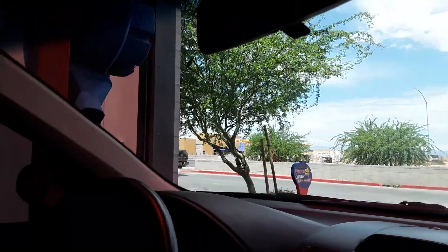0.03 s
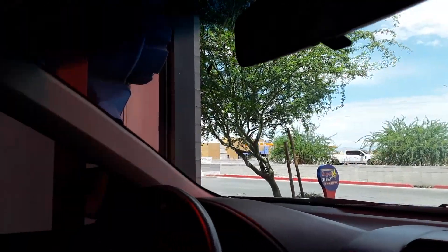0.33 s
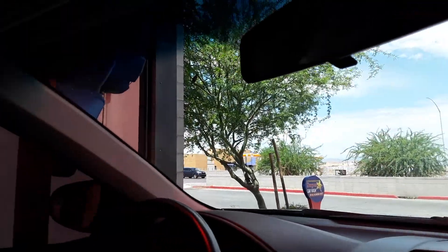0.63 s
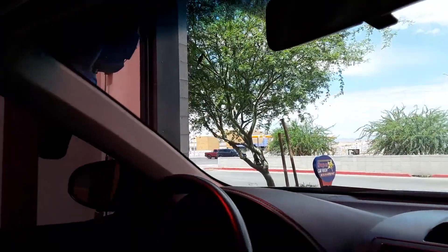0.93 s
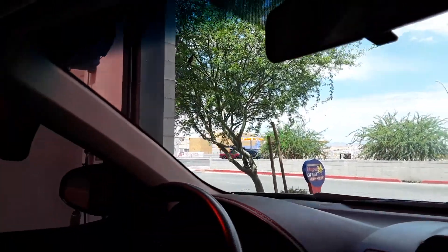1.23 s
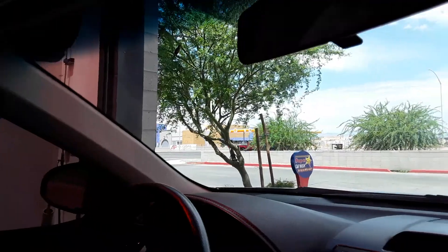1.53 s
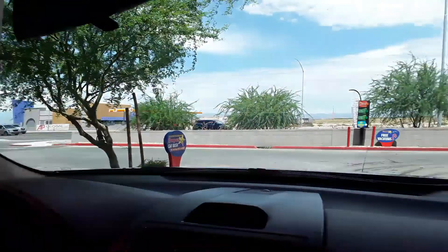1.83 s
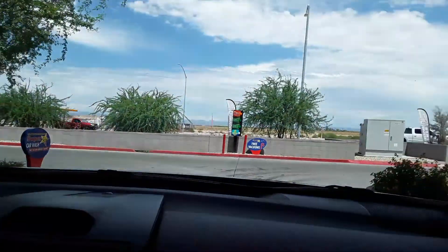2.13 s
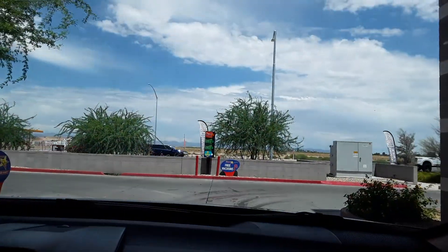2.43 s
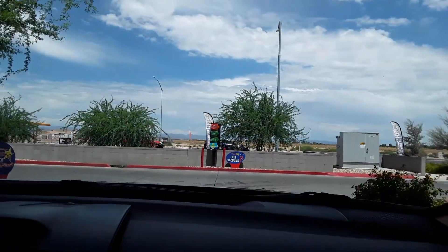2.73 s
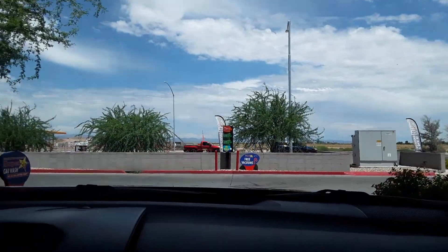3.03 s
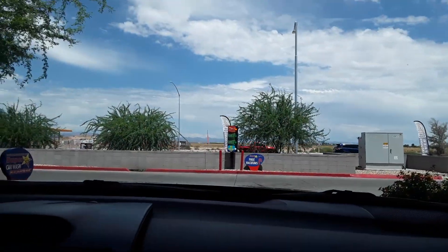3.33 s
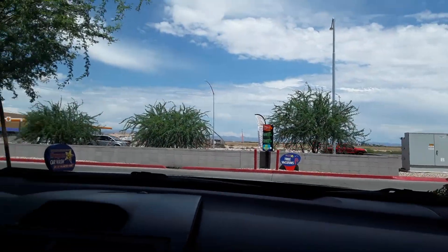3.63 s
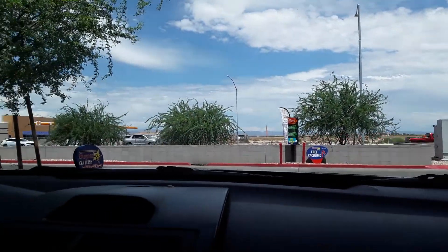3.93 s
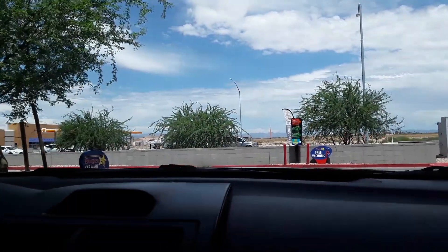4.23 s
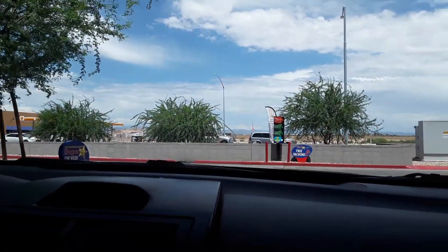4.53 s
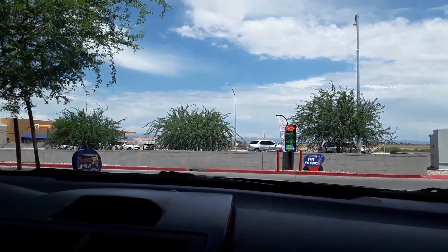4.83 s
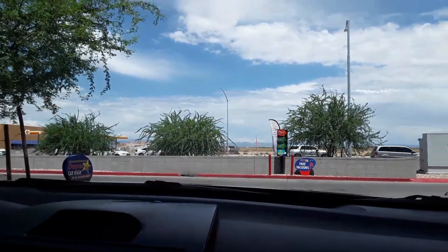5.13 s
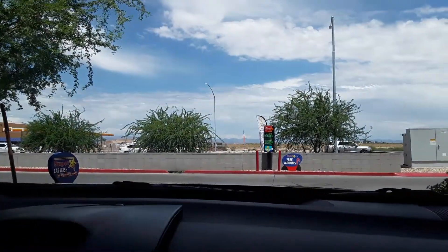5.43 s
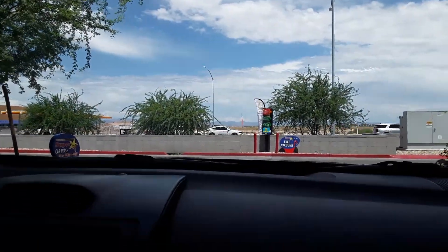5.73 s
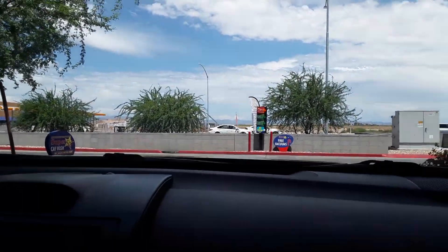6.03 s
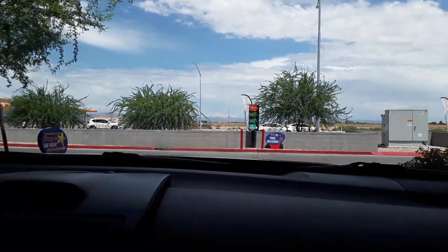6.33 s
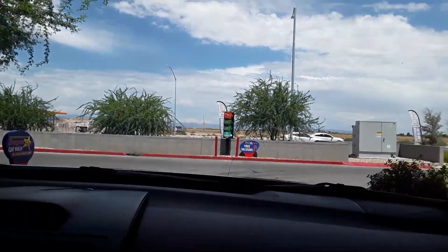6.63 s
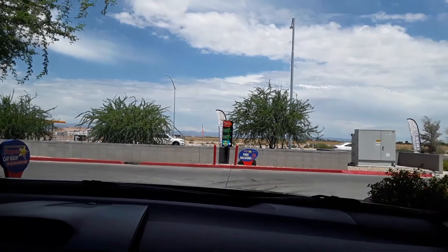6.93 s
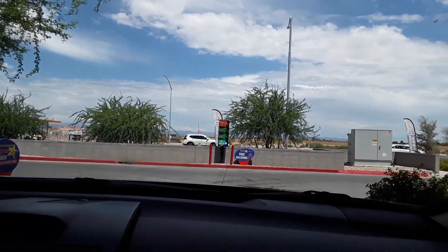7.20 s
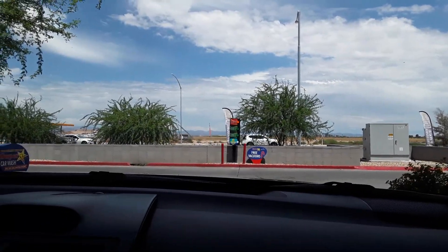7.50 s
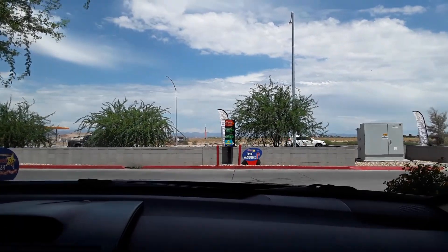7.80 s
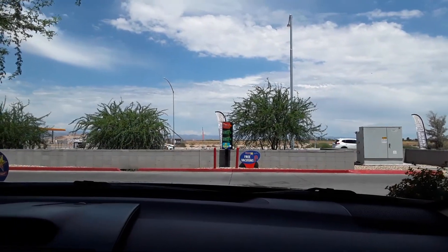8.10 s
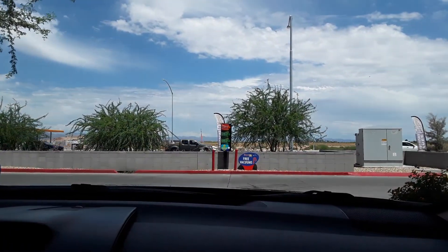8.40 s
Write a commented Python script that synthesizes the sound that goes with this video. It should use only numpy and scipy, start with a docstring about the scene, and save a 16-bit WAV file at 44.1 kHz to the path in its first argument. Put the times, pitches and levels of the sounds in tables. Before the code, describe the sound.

Strong blowers push a loud, deep rush of air over a car cabin as spray fizzes, easing slightly near the end.

```python
"""Air jets of car wash dryers, heard from inside a car that creeps out of the tunnel.
Their turbulence buffets the body, at times in harder gusts, and drives the cabin's low modes into a boom.
The blowers roar, with a faint blade tone, and air hisses along the seal of the left window.
Sheets of fine spray fizz on the glass, and two soft knocks sound on the body.
Near the end the rush fades and a few small hard impacts tick in the cabin."""
import sys
import numpy as np
from scipy import signal
from scipy.fft import rfft, irfft, next_fast_len
from scipy.io import wavfile
from scipy.ndimage import uniform_filter1d, minimum_filter1d

SR = 44100
rng = np.random.default_rng(int(sys.argv[2]) if len(sys.argv) > 2 else 0)


def dump_mix(stems):
    """Bounce the given channels to the path in sys.argv[1] as a 16-bit WAV at rate SR."""
    frames = np.atleast_2d(stems).T  # one column per channel
    limited = np.clip(frames, -1, 1)  # hard clip at full scale
    pcm = np.round(limited * 32767).astype(np.int16)
    wavfile.write(sys.argv[1], SR, pcm)


N = 381884
TIME = np.arange(N) / SR
FFT_SIZE = next_fast_len(N, real=True)
BINS_HZ = np.fft.rfftfreq(FFT_SIZE, 1 / SR)

# strength of the blowers and their air stream: time_s, roar_db, hiss_db
AIR_STREAM = [(0.0, -39.0, -40), (1.0, -40.5, -40.5), (1.25, -41.5, -45), (2.55, -40, -42.5),
              (3.3, -41, -43.5), (4.6, -41.0, -42.5), (5.0, -40.5, -41.5), (6.4, -41.5, -43),
              (7.2, -38.5, -41.5), (8.3, -44, -45.5), (8.66, -42.5, -45)]
# sheets of water blown over the glass: peak_s, length_s, level_db
WATER_SHEETS = [(0, 0.32, -59), (.73, 0.53, -53), (1.0, .12, -52), (1.35, .25, -63), (2.34, 0.082, -56),
                (3.09, 1, -54), (3.55, 0.33, -54), (4.9, 1.5, -50.5), (5.24, .07, -52), (5.65, 0.37, -62),
                (6.33, .06, -56), (6.58, .06, -53), (7.2, .65, -54), (7.63, .04, -54)]
MIST_DB = -65  # the thin spray between the sheets
# spectrum of water striking glass: frequency_hz, gain_db
SPRAY_SPECTRUM = [(5000, -17), (7700, -5.5), (8500, -3.5), (10700, -2.5), (11500, 4.5), (12900, 1),
                  (14100, -7), (14600, -11), (15100, -16), (15600, -8), (15900, -12)]


def jet_buffeting(lift_db, body_db=1.03, flutter_db=0.54, rush_share=0.45):
    """Forced vibration: turbulent jets shake roof and glass, and at first excite a panel resonance."""
    # force of the jets, falling as the car leaves: time_s, body_db, windscreen_db
    jets = [(0.0, -18.5, -34), (1.0, -18.5, -35), (1.4, -20.0, -36.5), (1.65, -19.5, -36.0),
            (2.05, -21.5, -36), (2.4, -20.5, -34.5), (3.25, -20, -36.5), (3.55, -18.5, -35.5),
            (3.95, -20.0, -34.5), (4.35, -18, -32.5), (4.7, -19.5, -35), (5.0, -19, -33.0),
            (5.4, -19.0, -36), (6.25, -23.0, -37), (6.9, -17.5, -35.5), (7.5, -21, -34.5),
            (8.2, -22.0, -38.5), (8.66, -29, -38.5)]
    # spectrum of the shaken body: frequency_hz, gain_db
    body_spectrum = [(130, -33), (215, -4.5), (265, -3.5), (300, -3.5), (360, 1), (400, -2.5), (425, -3.5),
                     (470, -4), (525, -8), (575, -9.5), (660, -13), (720, -15.5), (800, -23), (1200, -57.5)]
    # spectrum of the rush over the windscreen: frequency_hz, gain_db
    rush_spectrum = [(500, -12), (720, -0.5), (820, 1.5), (900, 0), (1030, 0), (1180, -4), (1350, -5.5),
                     (1500, -17), (2400, -39)]
    # drone of a panel while a jet stands on it: time_s, level_db
    drone = [(0, -20.5), (.5, -19.5), (1.1, -22), (1.7, -18), (2.0, -27.5), (2.6, -28.5), (8.66, -58)]
    body = level(jets) * steadied(turbulence(spectrum(body_spectrum)), size=6000)
    rush = level(jets, column=2) * turbulence(spectrum(rush_spectrum))
    panel = level(drone) * steadied(turbulence(resonance(hz=250.3, width_hz=33)), size=7000)
    gusting = gain_of(body_db + lift_db) * body + gain_of(rush_share * lift_db) * rush
    return gain_of(flutter_db * drift(rate_hz=11.5)) * gusting + panel


def cabin_boom(deep_lift_db, upper_lift_db, deep_db=-0.42, upper_db=-0.54, sway_db=1.56):
    """Cavity resonance: two groups of low air modes trade strength as the jets move along the car."""
    # the air's steady load on the cabin: time_s, deep_db, upper_db
    load = [(0.0, -11.5, -18.0), (0.8, -17, -20.5), (1.5, -15, -24), (2.5, -16, -18.5), (3.3, -18, -15),
            (4.5, -14.5, -16.5), (5.6, -18.5, -16.5), (6.6, -15.0, -18.5), (7.7, -18.5, -16.5),
            (8.2, -21, -17), (8.66, -20.5, -23)]
    # response of the deep modes: frequency_hz, gain_db
    deep_spectrum = [(15, -66), (30, -41), (48, -31), (62, -31), (80, -19.5), (98, -12), (113, -0.5),
                     (135, 0), (147, 4), (160, -19.5), (200, -22), (400, -80)]
    # response of the upper modes: frequency_hz, gain_db
    upper_spectrum = [(90, -48), (135, -9), (150, -4), (172, 1), (192, -5), (215, -15.5), (260, -39),
                      (400, -76.5)]
    deep = steadied(turbulence(spectrum(deep_spectrum)), size=3500)
    upper = steadied(turbulence(spectrum(upper_spectrum)), size=4000)
    trade_db = sway_db * drift(rate_hz=4.4)
    return (gain_of(deep_db + deep_lift_db + trade_db) * level(load) * deep
            + gain_of(upper_db + upper_lift_db - trade_db) * level(load, column=2) * upper)


def gust_lifts():
    """Unsteady loading: brief gusts shift each boom up or down in dB, and only ever raise the buffeting."""
    # a jet hits harder for a moment: peak_s, length_s, deep_db, upper_db, buffet_db
    gusts = [(0.148, 0.051, 4, 0, 1), (0.446, 0.087, 3.5, 1, 3), (.58, 0.059, 4, 2.5, 2),
             (1.693, 0.071, -7.5, 6.5, 5), (2.174, 0.12, -1, 5, -0.5), (2.328, 0.058, 4, 0, 2.5),
             (2.665, 0.13, 7, 0.5, 1), (4.21, 0.043, 0, 0, 1.5), (4.873, .12, -4, 3.5, 4),
             (5.198, 0.15, 7.5, 2, 1.5), (5.993, 0.069, 5.5, 1.5, 2), (6.57, 0.1, 3, -1, -1.5),
             (6.775, 0.14, 5.5, -9, 0.5), (7.192, .06, 6, 6.5, 4.5), (7.28, 0.11, -3, 5, 6),
             (7.604, 0.062, 4, 4.5, 0.5), (8.462, 0.053, -2, 10.5, 1)]
    return sum(np.outer([deep_db, upper_db, max(buffet_db, 0)], swell(peak_s, length_s))
               for peak_s, length_s, deep_db, upper_db, buffet_db in gusts)


def body_rumble():
    """Structural resonance: the whole body shudders, most strongly under each row of nozzles."""
    # passages under the nozzles: peak_s, length_s, level_db
    passes = [(1.75, 1.34, -30), (6.5, 2, -34)]
    shudder = steadied(turbulence(resonance(hz=77, width_hz=17.6)), size=9000)
    return swells(passes, floor_db=-38.5) * shudder


def blowers(blade_hz=706.7, waver_hz=1.3, throb_db=2, flutter_db=0.5, low_ring_db=-4):
    """Fan noise: a broadband roar, two duct resonances and a nearly steady blade-passing tone."""
    # spectrum of the roar: frequency_hz, gain_db
    roar_spectrum = [(800, -35), (1200, -18.5), (1420, 1.5), (1750, 0.5), (2250, -1.5), (2750, -5.5),
                     (3300, -9.5), (4200, -10.5), (5500, -29), (8000, -45)]
    # tone and duct grow as an outlet faces the car: time_s, tone_db, duct_db
    outlet = [(0, -58, -52), (1.0, -37.5, -47), (2.0, -40.5, -47), (2.6, -33, -44), (3.3, -43, -55),
              (5.2, -37, -51), (6.2, -36.5, -48), (6.9, -35, -45.5), (7.4, -41, -54), (8.66, -48, -62)]
    flutter = gain_of(flutter_db * drift(rate_hz=7.2))
    roar = flutter * level(AIR_STREAM) * turbulence(spectrum(roar_spectrum))
    high_ring = turbulence(resonance(hz=2320, width_hz=680))
    low_ring = gain_of(low_ring_db) * turbulence(resonance(hz=1385, width_hz=140))
    cycles = np.cumsum(blade_hz + waver_hz * drift(rate_hz=11)) / SR
    tone = gain_of(throb_db * drift(rate_hz=12)) * np.sin(2 * np.pi * cycles)
    return roar + level(outlet, column=2) * (high_ring + low_ring) + level(outlet) * tone


def window_hiss(trim_db=-0.35, flutter_db=0.57):
    """Flow noise: air hisses along the window seal and at first resonates in a gap of it."""
    # spectrum of the flow along the seal: frequency_hz, gain_db
    hiss_spectrum = [(2000, -41), (3000, -2), (3700, 2.5), (4400, 2), (5300, -4), (5950, -5), (6500, -2),
                     (6950, -0.5), (7350, -7), (7750, -22), (9000, -22), (16000, -52)]
    # hollow hiss of the gap: time_s, level_db
    gap = [(0, -42.5), (.45, -45.5), (.9, -55), (1.3, -50), (8.66, -70)]
    flutter = gain_of(trim_db + flutter_db * drift(rate_hz=15))
    hiss = level(AIR_STREAM, column=2) * flutter * turbulence(spectrum(hiss_spectrum))
    return hiss + level(gap) * turbulence(resonance(hz=4230, width_hz=1700))


def spray(trim_db=2.0, drop_db=4, spread_db=3, drops_per_s=350, splash_db=1.7):
    """Shot noise: mist and single drops strike the glass at random and merge into a splashing fizz."""
    sizes = gain_of(drop_db + spread_db * np.minimum(rng.exponential(1, N), 4))
    drops = sizes * (rng.random(N) < drops_per_s / SR) * rng.standard_normal((2, N))
    mist = rng.standard_normal((2, N))
    fizz = shimmered(in_cabin(drops + mist, spectrum(SPRAY_SPECTRUM)), depth_db=1.5)
    splashes = gain_of(trim_db + splash_db * drift(rate_hz=45))
    return swells(WATER_SHEETS, MIST_DB) * splashes * fizz


def droplets(trim_db=-8, spread_db=3, drops_per_s=40, t60_s=.02):
    """Impact noise: stray larger drops crackle on the glass with each sheet, each a decaying burst."""
    sizes = gain_of(spread_db * np.minimum(rng.exponential(1, N), 3))
    impacts = sizes * (rng.random(N) < drops_per_s / SR)
    decay = gain_of(-60 * TIME[:SR // 10] / t60_s)
    splats = unit_rms(signal.oaconvolve(impacts, decay)[:N])
    crackle = splats * turbulence(spectrum(SPRAY_SPECTRUM))
    return gain_of(trim_db) * swells(WATER_SHEETS, MIST_DB) * crackle


def ticks(click_t60_s=0.026, rise_s=0.00067, pan_left_db=2.5, ring_db=-5):
    """Free vibration: a small hard object clicks, then rings briefly in its damped modes."""
    # the impacts: start_s, level_db, ring_time_factor, click_share
    strikes = [(7.917, -30, .6, 1), (7.922, -23, .45, 1), (7.975, -39, .6, .9), (8.058, -38, 1.7, .8),
               (8.097, -46, 1, .7), (8.434, -48, .8, .9)]
    # modes of the object: pitch_hz, level_db, t60_s
    modes = [(5453, -8, .04), (6750, -11, 0.043), (9800, -16, .05), (10730, -6, .05), (12960, 2, .045),
             (13150, -8, .04), (14900, -9, .025)]
    # spectrum of the dry click: frequency_hz, gain_db
    click_spectrum = [(2500, -20), (4300, 2), (6800, 1), (8500, -4), (13000, 0), (15700, 0), (17000, -30)]
    out, t = np.zeros((2, N)), np.arange(SR // 3) / SR
    noise = unit_rms(filtered(rng.standard_normal((2, N)), spectrum(click_spectrum)))
    attack = 1 - np.exp(-t / rise_s)
    for k, (start_s, level_db, ring_time_factor, click_share) in enumerate(strikes):
        click = noise[:, k * len(t):(k + 1) * len(t)] * gain_of(-60 * t / click_t60_s)
        ring = sum(gain_of(mode_db - 60 * t / (t60_s * ring_time_factor))
                   * np.sin(2 * np.pi * (pitch_hz * t + rng.random((2, 1))))
                   for pitch_hz, mode_db, t60_s in modes)
        add(out, start_s, gain_of(level_db) * (click_share * click + gain_of(ring_db) * ring) * attack)
    return out * gain_of([[pan_left_db], [-pan_left_db]])


def knocks(t60_s=0.069):
    """Heavy damping: knocks on the body die quickly in one broad resonance, half masked by the rush."""
    # soft blows on the body: start_s, level_db, pitch_hz
    blows = [(4.909, -34, 1050), (5.603, -25.5, 1150)]
    out, t = np.zeros((2, N)), np.arange(SR // 5) / SR
    for start_s, level_db, pitch_hz in blows:
        band = turbulence(resonance(pitch_hz, width_hz=620))[:, :len(t)]
        add(out, start_s, gain_of(level_db - 60 * t / t60_s) * band)
    return out


def in_cabin(drives, response):
    """Spatial coherence: long waves reach both ears alike; short ones differ and favour the left."""
    # likeness of left and right: frequency_hz, correlation
    coherence = [(165, 1), (240, 0.78), (360, 0.95), (550, 0.61), (750, 0.56), (1000, 0.28), (1200, -0.07),
                 (1600, -0.37), (2050, -0.26), (2700, 0.23), (3800, -0.16), (4800, 0.06), (8000, 0)]
    # level difference between the sides: frequency_hz, left_minus_right_db
    balance = [(60, 3), (190, -1.8), (260, 1.5), (700, 1), (1900, -1.4), (2900, 3.5), (3700, 7.5),
               (4500, 12.5), (5600, 10), (6800, 14.5), (7800, 6), (9000, 6.5), (12500, 4), (15000, 1.5)]
    common, independent = rfft(drives, FFT_SIZE)
    correlation = np.clip(per_bin(coherence), -.975, .975)
    right = correlation * common + np.sqrt(1 - correlation ** 2) * independent
    tilt = spectrum(balance)
    pair = np.array([tilt * common, right]) / np.sqrt(1 + tilt ** 2)
    out = irfft(pair * response, FFT_SIZE)[:, :N]
    return out / np.sqrt(np.mean(out.mean(0) ** 2))


def turbulence(response):
    """Random pressure of moving air, shaped by a frequency response and heard in the cabin."""
    return in_cabin(rng.standard_normal((2, N)), response)


def resonance(hz, width_hz):
    """Frequency response of one resonance with steep skirts."""
    return 1 / (1 + ((BINS_HZ - hz) / (0.62 * width_hz)) ** 2)


def drift(rate_hz):
    """Random modulation of rms 1, rolling off above the given rate."""
    lowpass = (BINS_HZ > 1) / (1 + (BINS_HZ / rate_hz) ** 2)
    return unit_rms(filtered(rng.standard_normal(N), lowpass))


def steadied(x, size):
    """Division by a running rms over size samples evens out slow swells and keeps quick beating."""
    power = uniform_filter1d(uniform_filter1d(x.mean(0) ** 2, size), size)
    return x / np.sqrt(abs(power) + 1e-9)


def shimmered(x, depth_db):
    """Random modulation by band: patches of the spectrum, some hundred Hz wide, swell and sink."""
    frames = signal.stft(x, nperseg=512)[2]
    bands = uniform_filter1d(rng.standard_normal(frames.shape[1:]), size=6, axis=0)
    patches = unit_rms(uniform_filter1d(bands, size=18, axis=1))
    return unit_rms(signal.istft(frames * gain_of(depth_db * patches), nperseg=512)[1][:, :N])


def swell(peak_s, length_s):
    """Gaussian envelope, 1 at its peak and above half height for the given length."""
    return 2 ** -((2 * (TIME - peak_s) / length_s) ** 2)


def swells(rows, floor_db):
    """Incoherent addition: the gain of swells whose powers sum over a floor."""
    power = sum(gain_of(level_db) ** 2 * swell(peak_s, length_s) for peak_s, length_s, level_db in rows)
    return np.sqrt(gain_of(floor_db) ** 2 + power)


def level(rows, column=1):
    """One dB column of a time curve as a gain at every sample."""
    rows = np.asarray(rows)
    return gain_of(np.interp(TIME, rows[:, 0], rows[:, column]))


def per_bin(points):
    """Interpolates (frequency_hz, value) points along a logarithmic frequency axis."""
    hz, value = np.transpose(points)
    return np.interp(np.log(BINS_HZ + 1), np.log(hz + 1), value)


def spectrum(points):
    """Frequency response through (frequency_hz, gain_db) points."""
    return gain_of(per_bin(points))


def filtered(x, response):
    """Linear filtering by a gain at every frequency."""
    return irfft(rfft(x, FFT_SIZE) * response, FFT_SIZE)[..., :N]


def gain_of(db):
    """Decibels to an amplitude ratio."""
    return 10 ** (np.asarray(db) / 20)


def unit_rms(x):
    """Scales to rms 1."""
    return x / np.sqrt(np.mean(x ** 2) + 1e-20)


def add(mix, start_s, sound):
    """Superposes a stereo sound on the mix."""
    part = mix[:, round(start_s * SR):][:, :sound.shape[1]]
    part += sound[:, :part.shape[1]]


def scene():
    """Superposition: air, water and small impacts sum in the cabin."""
    deep_lift_db, upper_lift_db, buffet_lift_db = gust_lifts()
    jets = cabin_boom(deep_lift_db, upper_lift_db) + body_rumble() + jet_buffeting(buffet_lift_db)
    fans = gain_of(0.17 * buffet_lift_db) * blowers()  # the blowers follow the gusts only slightly
    return jets + fans + window_hiss() + spray() + droplets() + ticks() + knocks()


def record(dry):
    """Peak limiting holds the largest swings under full scale; a low-pass filter then limits the band."""
    ceiling, cutoff_hz = .97, 15830
    gain = minimum_filter1d(ceiling / np.maximum(abs(dry).max(0), ceiling), size=1200)
    limited = dry * uniform_filter1d(uniform_filter1d(gain, size=600), size=600)
    lowpass = signal.firwin(1023, cutoff_hz, window=("kaiser", 9), fs=SR)
    return signal.oaconvolve(limited, lowpass[None], "same", axes=1)


dry = scene()
out = record(dry)
dump_mix(out)
```